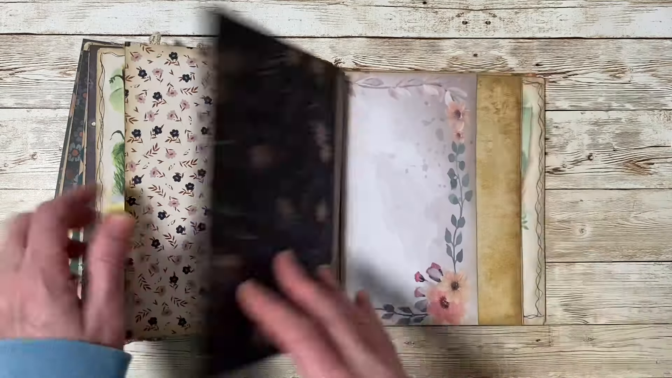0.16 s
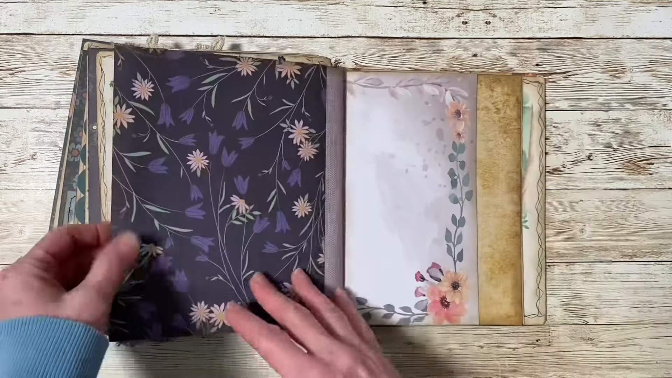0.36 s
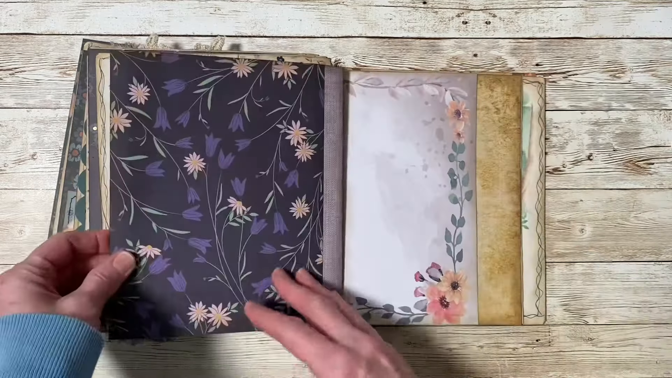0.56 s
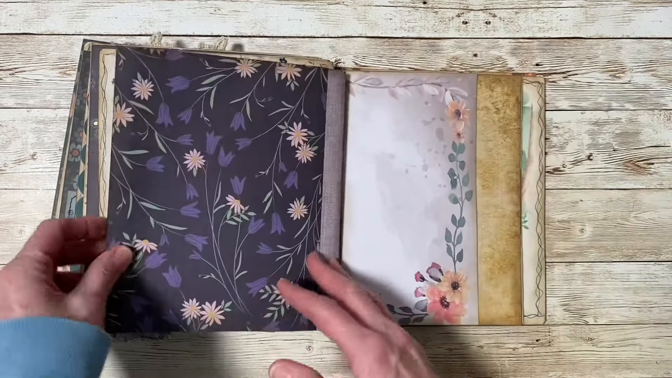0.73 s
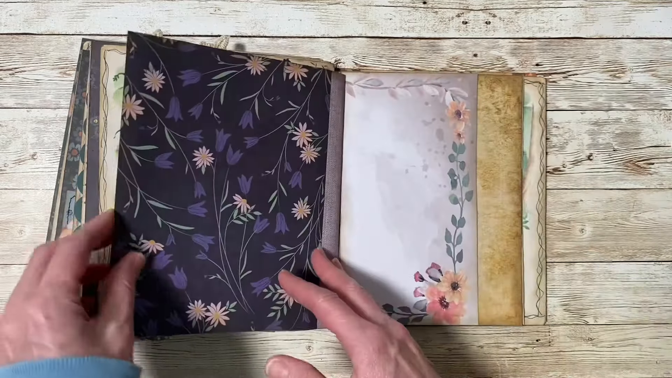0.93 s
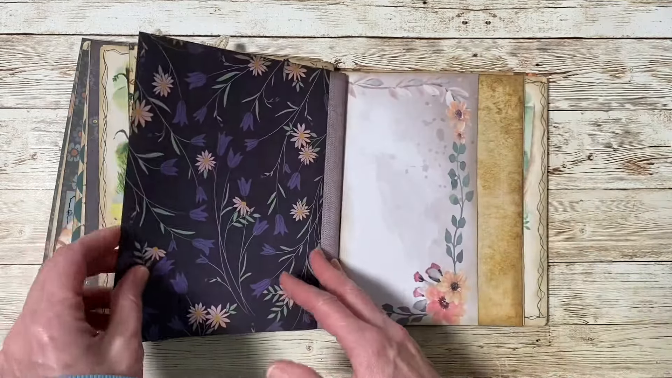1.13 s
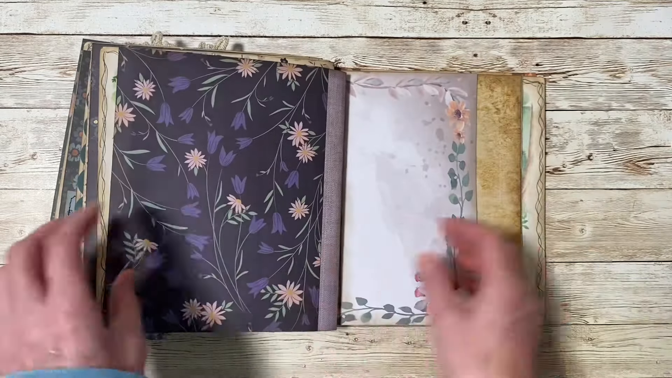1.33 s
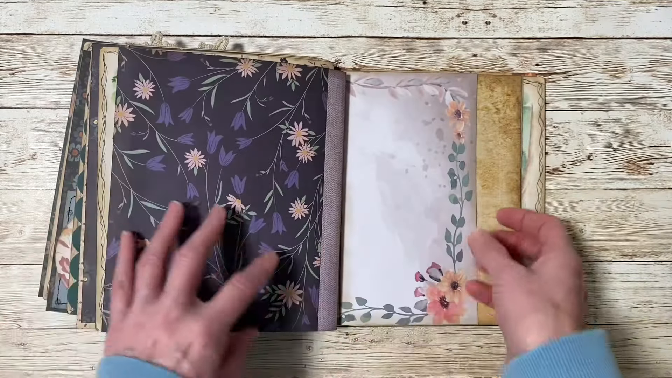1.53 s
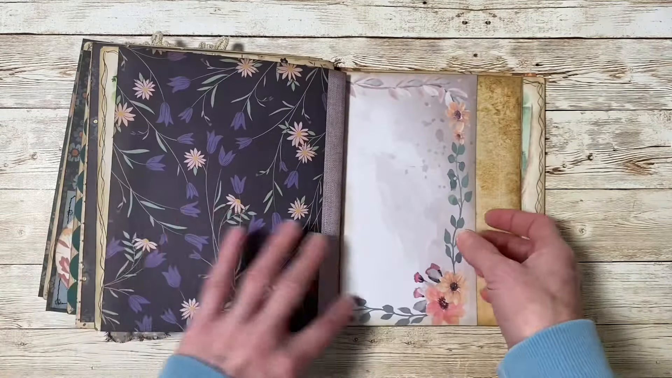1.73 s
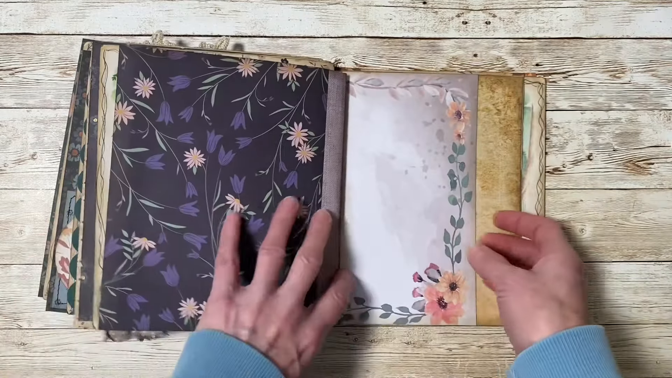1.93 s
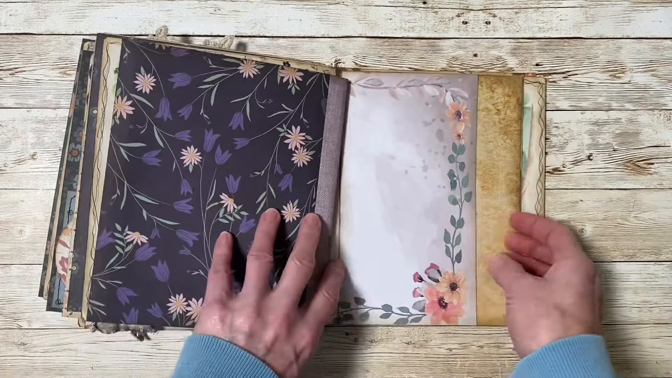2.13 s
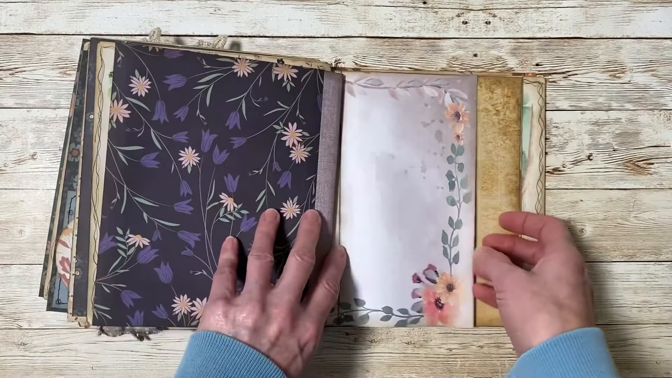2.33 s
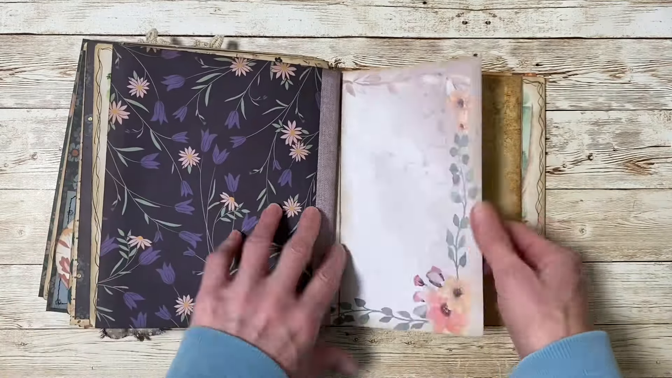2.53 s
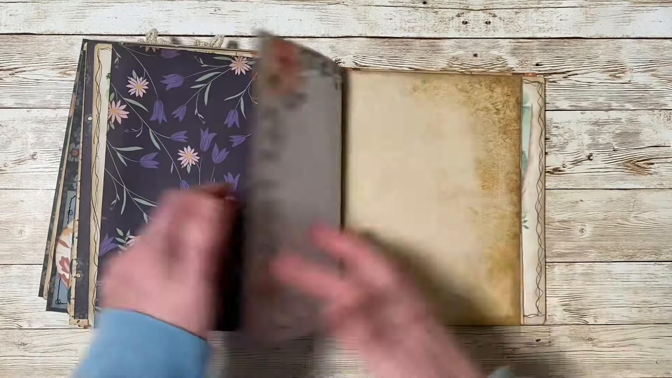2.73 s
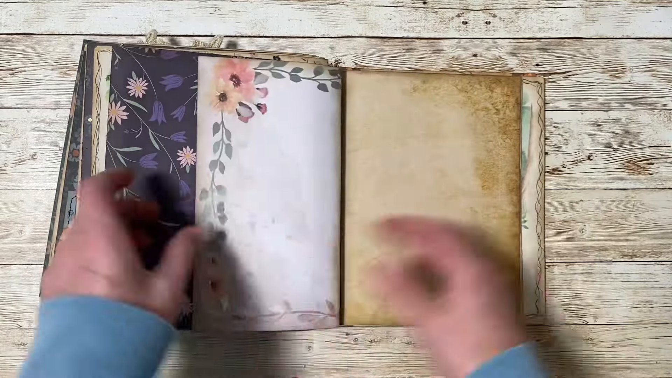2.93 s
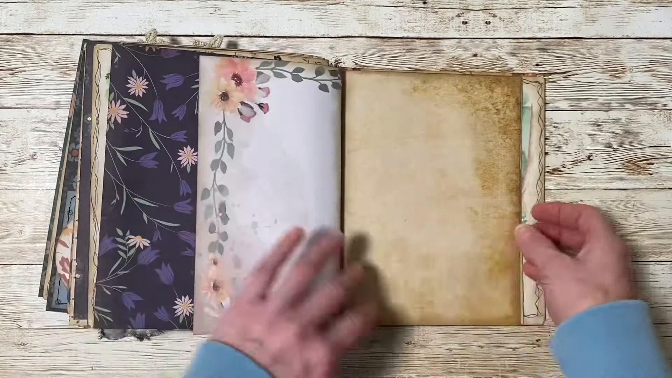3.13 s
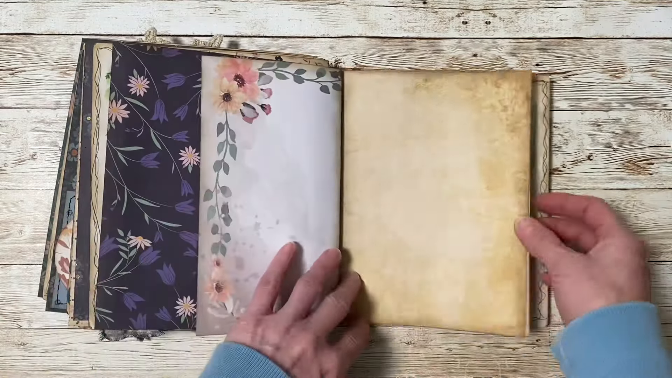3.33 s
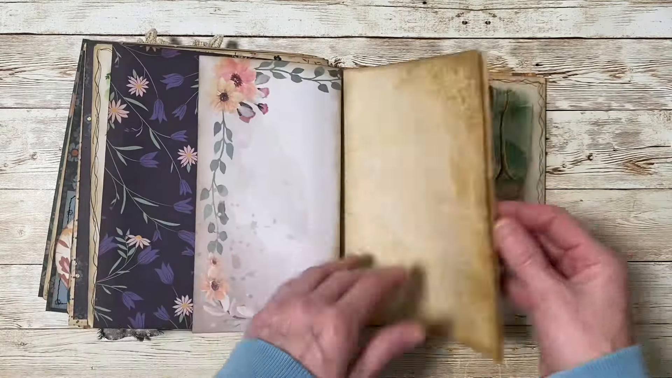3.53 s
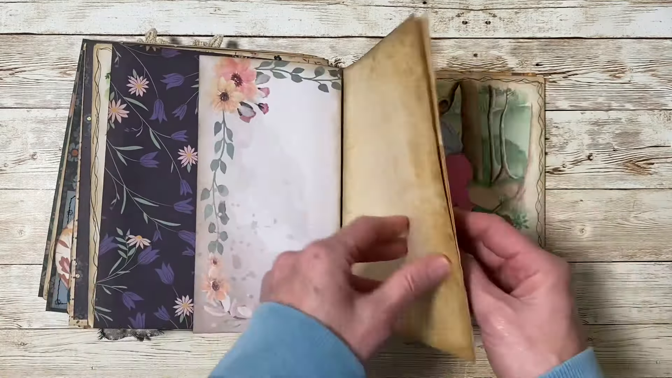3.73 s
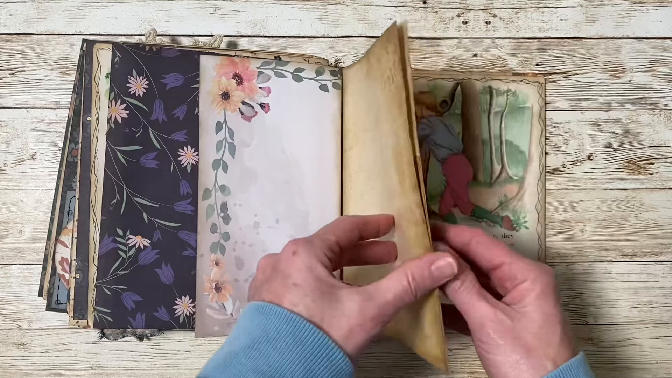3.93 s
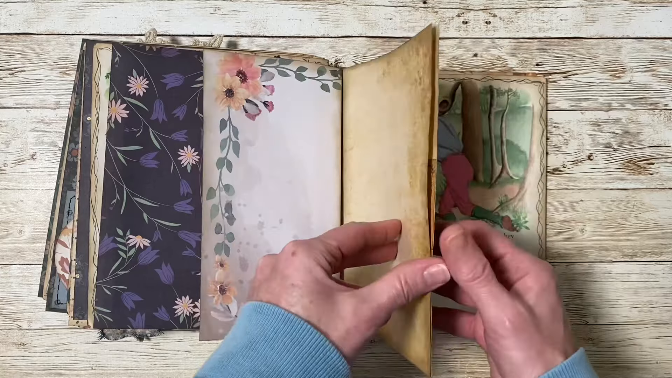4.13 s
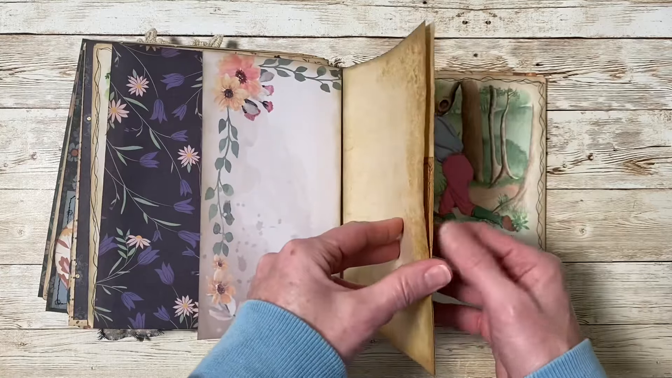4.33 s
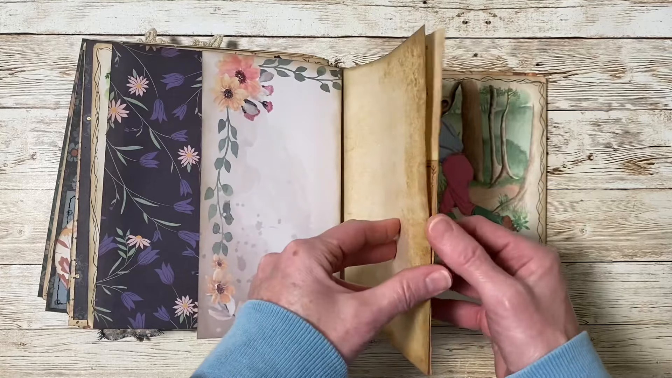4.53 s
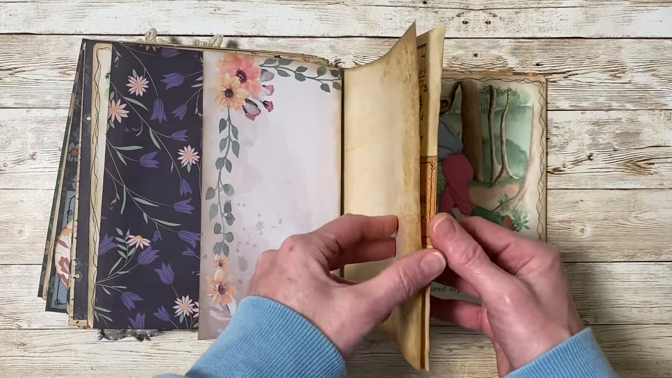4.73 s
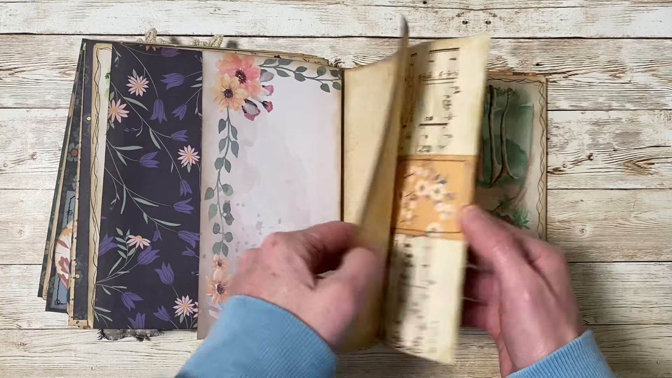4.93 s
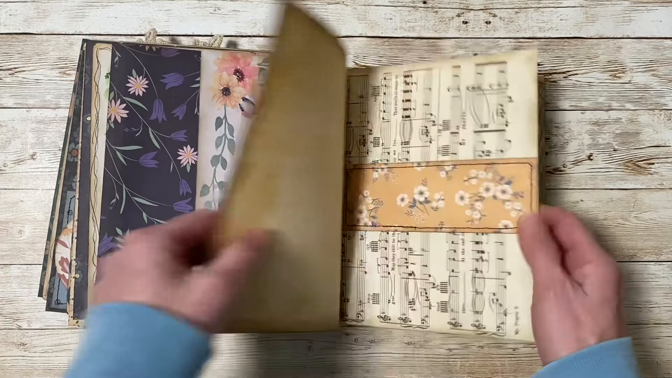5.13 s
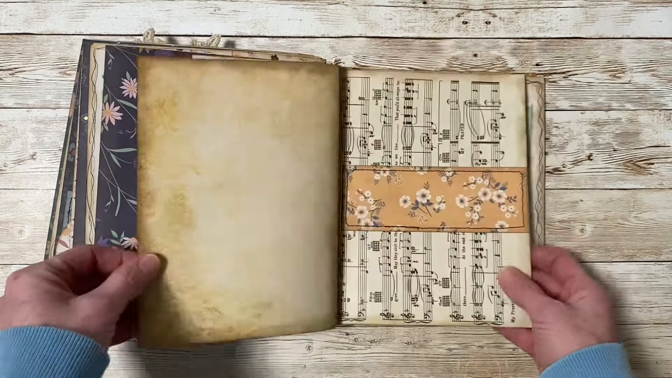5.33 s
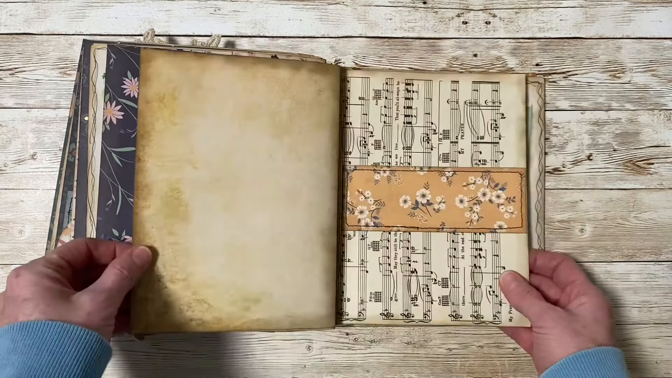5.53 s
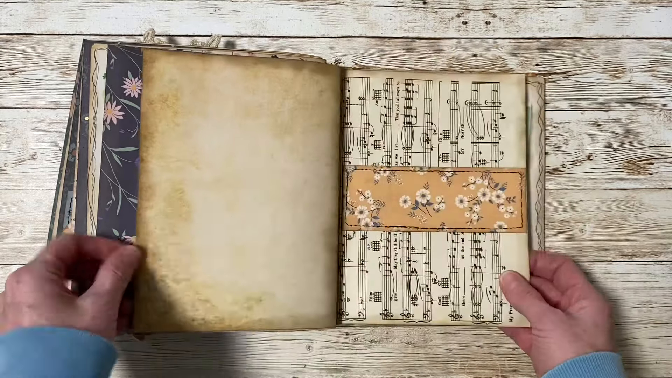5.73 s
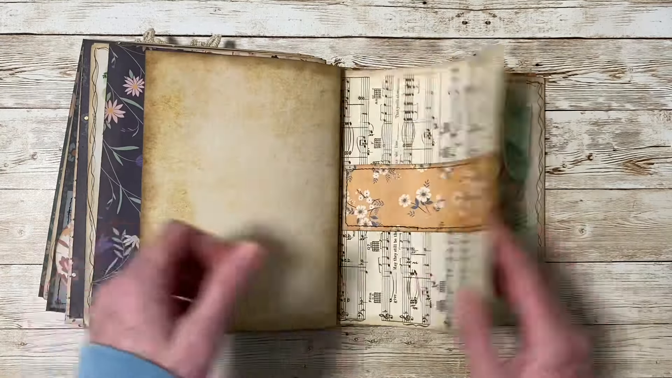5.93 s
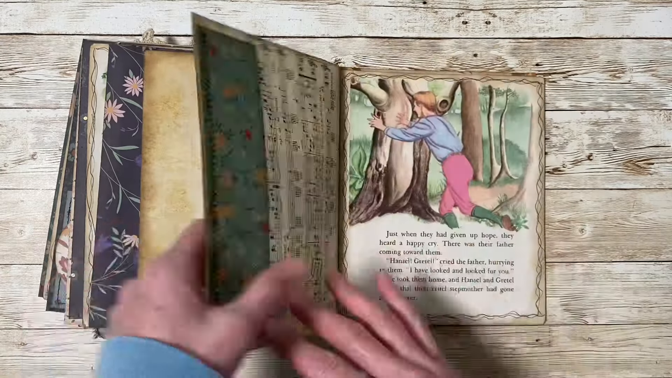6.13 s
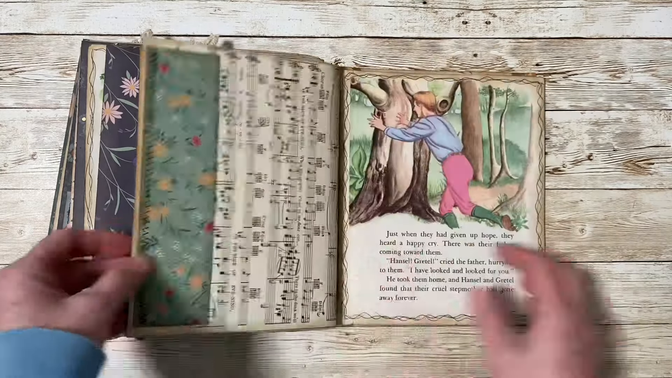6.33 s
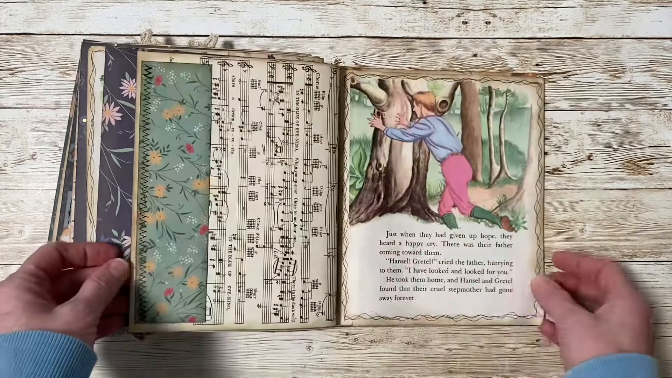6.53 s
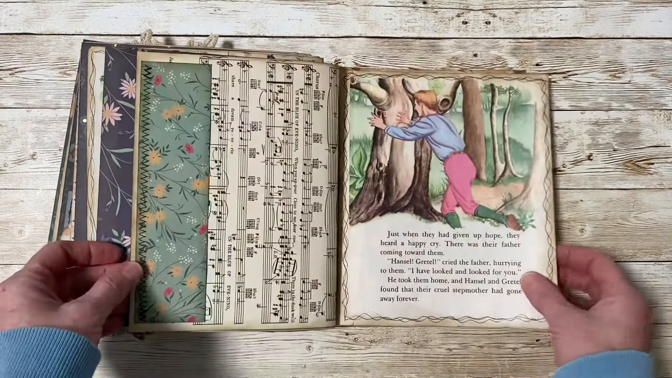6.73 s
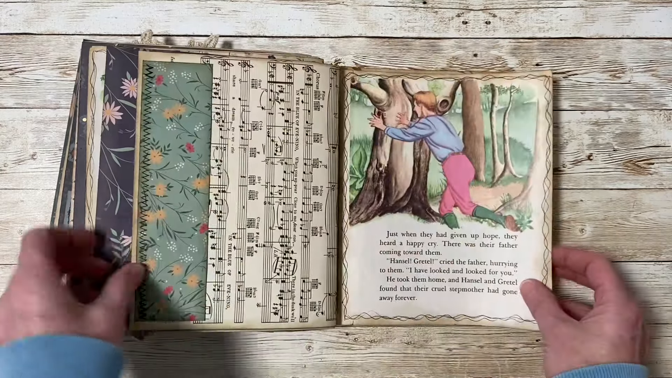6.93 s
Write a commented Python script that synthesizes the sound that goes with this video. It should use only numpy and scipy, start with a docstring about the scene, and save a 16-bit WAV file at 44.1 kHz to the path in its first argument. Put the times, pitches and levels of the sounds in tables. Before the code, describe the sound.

Hands leaf through a thick handmade paper book on a wooden table. A soft brushing and faint puff of air come first, then quiet rubbing and small ticks. A sharp, bright snap bursts out at about two and a half seconds, followed by rustles, a duller flap, a livelier swishing turn and another flap, ending in faint sliding. Close stereo camera microphones, small room, low rumble and faint hum.

```python
"""First a brushing of stiff paper over a low room rumble and faint mains hum, with soft puffs of air.
Place: a small room; a handmade book on a wooden table, two microphones close by in a camera.
Sheets and fingers slide as filtered noise of unequal slips; edges tick, bent pages snap through and slap
as bursts ringing through narrow papery resonances. Pressed pages thud as low damped sines, skin rasps as
wavering tones, and a short diffuse stereo tail of shaped noise follows the paper."""
import sys
import numpy as np
from scipy import signal
from scipy.fft import rfft, irfft, next_fast_len
from scipy.io import wavfile
from scipy.ndimage import uniform_filter1d, map_coordinates

SR = 44100
rng = np.random.default_rng(int(sys.argv[2]) if len(sys.argv) > 2 else 0)


def wav_record(signal):
    """Record a signal, one row per channel, as 16-bit PCM in the file named by sys.argv[1]."""
    frames = np.transpose(np.atleast_2d(signal))
    bounded = np.clip(frames, -1, 1)
    # unit amplitude maps onto the largest positive 16-bit level
    quanta = np.round(bounded * 32767).astype(np.int16)
    wavfile.write(sys.argv[1], SR, quanta)


N = 311698  # length in samples

# Room rumble and hiss. Each row: frequency in Hz, relative level in dB per Hz.
ROOM_AIR_SPECTRUM = [(20, -1.5), (45, 2.5), (70, 7), (100, 5), (150, 3), (200, -8.5), (300, -14),
                     (600, -53.5), (2000, -43), (6000, -45), (15800, -43)]
# Mains hum. Each row: frequency in Hz, mean level in dB rms.
HUM_TONES = [(59.7, -64.5), (119.8, -68.5)]
# Air pushed by a swinging page or hand. Each row: peak time in seconds, rise and fall time constant in
# seconds, peak level in dB.
AIR_PUFFS = [(0.02, 0.15, -50.5), (2.84, .38, -53), (3.749, 0.16, -67), (6.1, .25, -63.5),
             (7.0, 0.24, -70.5)]
# Colour of the air puffs. Each row: frequency in Hz, relative level in dB.
PUFF_SPECTRUM = [(12, -35.0), (28, -15.0), (40, -4.5), (52, -2.5), (75, -12.5), (200, -49.5)]
# A sheet or finger slides. Each row: start in seconds, length in seconds, rubbing level in dB, swell over
# the stroke in dB, edge hiss over the rub in dB, sheet flexing over the rub in dB.
SLIDING_STROKES = [(0.0, 0.069, -68.5, 10, 3.5, 3), (0.1, 0.13, -74.5, 0, -7, 7),
                   (0.229, .1, -63.5, -9, -1, 1.5), (0.346, .15, -76, -7.5, 4, 0.5),
                   (0.564, 0.16, -72, 12.5, 6, -11), (0.814, 0.36, -79.5, -4.5, 4.5, -5.5),
                   (1.162, 0.05, -71, 12, 5, -19), (1.232, 0.012, -71, 7, 13, -5),
                   (1.385, .2, -75, 3, 2.5, -5), (1.785, .06, -73.5, -3, 4, -6.5),
                   (1.847, 0.19, -66, 3.5, 2.5, -9), (2.105, 0.37, -66.5, 1.5, 1.5, -9),
                   (2.36, 0.045, -55.5, -8, -4, -12.5), (2.421, 0.048, -56.5, 17, 3.5, -16),
                   (2.506, .14, -58, -1.5, -6, -1.5), (2.658, .07, -70.5, -1, 5, -3.5),
                   (2.75, 0.13, -61, -1.5, 3.5, -1), (2.91, 0.013, -61.5, -0.5, 4.5, -7.5),
                   (3.184, 0.16, -66, -2, -2.5, -0.5), (3.346, 0.11, -56, -1.5, 0, -12),
                   (3.47, 0.19, -65.5, 7, 4.5, -6), (3.684, 0.084, -64, -9, 5, -3.5),
                   (3.783, 0.064, -67, 2, 7, -8.5), (3.87, 0.11, -77.5, 7.5, 10.5, -2.5),
                   (3.959, 0.15, -68.5, -7.5, 1.5, -0.5), (4.172, 0.049, -62.5, 0.5, 2.5, -6.5),
                   (4.265, .17, -82, -8, 0.5, 5.5), (4.465, 0.064, -68, 7.5, 1, -2.5),
                   (4.541, 0.1, -68.5, 2, 4, -1), (4.795, .04, -64, -4, -9, 6),
                   (4.847, 0.065, -58, 10, 5.5, -11), (4.898, 0.15, -51, -5.5, -6, -9),
                   (5.027, 0.088, -57.5, -2, -1.5, -7), (5.133, 0.22, -57.5, 0, 1.5, -7),
                   (5.583, .17, -76.5, 0, 9, -16), (5.707, 0.021, -64, 2, 9.5, -12.5),
                   (5.773, 0.16, -62, 3.5, -3.5, -10.5), (5.949, .08, -60.5, 0, 5, -4.5),
                   (6.065, 0.069, -50.5, -6.5, -7.5, -2.5), (6.15, 0.078, -62.5, -3.5, 2.5, -1),
                   (6.228, .17, -68, 4.5, 5, -5), (6.418, 0.23, -82, -0.5, 5, 13.5),
                   (6.56, 0.26, -64, -2, 0, -6.5), (6.817, 0.11, -69.5, 3, 3, -7),
                   (6.887, 0.16, -64, -3.5, 2, -15)]
# Colours of a bending sheet, a rubbed face and a hissing edge.
# Each row: frequency in Hz, relative level in dB per Hz.
FLEX_SPECTRUM = [(80, -19), (180, 7), (350, 0), (700, -3.5), (1000, -13.5), (2500, -43.5)]
RUB_SPECTRUM = [(400, -31.5), (750, 3), (1100, 2.5), (1400, 0), (2000, 1), (3100, -1), (4200, 1.5),
                (5200, -23.5), (9000, -46.5)]
HISS_SPECTRUM = [(2000, -39.5), (3600, -22.5), (4700, 2.5), (6500, 0.5), (8000, 0), (10000, 0.5),
                 (13000, 3), (15800, -5)]
# Stereo spread of the sliding, chosen freely. Each row: frequency in Hz, gain in dB.
SLIDING_SPREAD = [(300, -9.5), (1700, -20.5), (3000, -8.5), (5500, -19.5), (7500, -38.5), (15000, -16)]
# Edges and fingertips catch and let go. Each row: start in seconds, level in dB as rms over 10 ms before
# register colour, hardness in dB, weight in dB.
EDGE_TICKS = [(0.2093, -58.5, -2, 5), (0.2972, -58.5, 2.5, -6), (0.3309, -59, -2, -20),
              (0.3975, -66.5, -6, -4), (1.394, -61, -1, -23), (1.515, -58.5, 3, -13),
              (1.541, -58.5, -4, -8), (1.56, -73, 5, -5), (1.58, -52.5, -5.5, -6.5), (1.936, -62, -4, -10),
              (2.2458, -53.5, -11, -27), (2.3324, -55, -4, -16), (2.5115, -34, -24, -30),
              (2.5826, -44, -8, -12), (2.7394, -55, -3.5, -10), (2.8798, -56, 0, 1), (3.025, -71, 14, -17),
              (3.0414, -59.5, 4.5, -17), (3.0493, -54.5, 4.5, -21.5), (3.1854, -57, 2, -12),
              (3.2003, -57, 1.5, -11), (3.2591, -53.5, -6, -12), (3.2994, -59.5, 2, -12),
              (3.3168, -63, 2, -2), (4.022, -66, 7.5, -5), (4.0581, -60, -7, -6), (4.188, -61, 6, -13),
              (4.2354, -58.5, 0, -5.5), (4.3372, -75.5, 8.5, 1), (4.53, -63.5, -8, 2),
              (4.6145, -72.5, 16.5, -6), (4.7859, -60.5, -16, -9), (4.8067, -60, -12, 4),
              (4.8194, -60, -21, 6), (4.9444, -46.5, 5, -4.5), (5.1215, -67.5, 3, 11),
              (6.1121, -43, -26, -6), (6.1356, -51, -3, -4.5), (6.575, -61, 5, 0)]
# A page buckles or lands. Each row: start in seconds, rise in seconds, t60 in seconds before register
# stretch, level in dB as rms over 10 ms before register colour, hardness in dB, weight in dB.
PAGE_FLAPS = [(0.215, 0.0026, 0.022, -48.5, -3, 5), (0.256, 0.0016, .05, -56.5, 5, 12),
              (2.3543, .0009, 0.018, -31.5, 4, -29.5), (2.356, .002, 0.043, -34.5, -6, -16),
              (2.476, 0.0044, 0.008, -29.5, -5.5, -29), (2.481, 0.0054, 0.06, -21, -15.5, -23.5),
              (2.508, 0.018, 0.12, -40.5, -23, -13), (2.585, .009, .067, -43, -23, -4),
              (2.787, 0.0077, 0.096, -38, -27, -9), (2.817, 0.003, 0.034, -43.5, -7, -6.5),
              (3.335, 0.0023, 0.044, -47.5, -1, -8.5), (3.639, .0078, 0.056, -33, -6, -7),
              (3.667, 0.0054, 0.16, -45.5, -10.5, 0.5), (4.632, 0.0031, 0.045, -58.5, 10.5, -9),
              (4.902, .0016, 0.032, -37.5, 2.5, -14), (5.271, 0.0084, 0.086, -45.5, 1.5, -6.5),
              (5.415, 0.0098, .1, -51.5, 6.5, -31.5), (6.047, 0.0019, 0.028, -37, 2, -29),
              (6.053, 0.0029, 0.063, -32.5, -9, -10.5), (6.095, 0.005, 0.11, -43, -15, -2.5),
              (6.185, .0035, 0.088, -55, -13, 7), (6.58, 0.0099, 0.19, -70.5, 10, 17),
              (6.647, 0.006, 0.099, -65.5, -10, 10.5), (6.779, 0.008, .078, -49.5, -5.5, -27)]
# Five registers of a contact: thump, knock, body, crack, fizz.
# Each row: low edge in Hz, high edge in Hz, lag in seconds, decay stretch as a factor.
CONTACT_REGISTERS = [(83.5, 480, 0.00052, 1.6), (484, 1426, 0.0013, 1.06), (1364, 3330, 0.0015, 1.1),
                     (4100, 6800, 0.0017, 0.96), (7440, 16000, 0.0016, 0.99)]
# One value per register: level of a page, then of a tick [dB].
PAGE_COLOUR_DB = [0, 3, 0, 0.5, -4]
CLICK_COLOUR_DB = [-1, 1, -1.5, -1, -1]
# One value per register: share of the weight (lifts the lows), then of the hardness (lifts the highs) [dB/dB].
WEIGHT_BY_REGISTER = [0.86, .42, 0.0084, 0.03, 0.1]
HARDNESS_BY_REGISTER = [0.073, 0, 0.014, 0.91, 1.17]
# Broad colour of a struck page. Each row: frequency in Hz, relative level in dB.
SHEET_SPECTRUM = [(120, 4), (350, -3.5), (650, -3), (820, 0), (1100, 0), (1380, 2.5), (1950, 3), (2600, 0),
                  (3150, -0.5), (4000, -0.5), (5200, -1), (6400, -2.5), (8000, -1), (10000, -5.5),
                  (15500, -19)]
# Narrow resonances that give the contacts a papery ring.
# Each row: frequency in Hz, width in Hz, strength in dB.
PAPERY_RESONANCES = [(474, 98, -7), (608, 81, -4.5), (878, 14, -3), (1090, 68, -0.5), (1152, 29, -1),
                     (1315, 35, -4.5), (1670, 32, -4), (1910, 22, -4.5), (2024, 66, 3), (2210, 56, 1),
                     (2400, 49, -1.5), (2730, 27, -9), (2900, 24, 0), (3240, 72, -2.5)]
# Hands and pages press on the thick book. Each row: start in seconds, pitch in Hz, t60 in seconds,
# level in dB of the decay before its soft onset.
BOOK_THUDS = [(1.596, 128, 0.14, -48), (2.486, 133, 0.092, -56), (3.645, 163, 0.12, -40.5),
              (6.419, 306, 0.082, -45), (6.586, 204, 0.15, -47.5)]
# Short pitched drags of skin or paper. Each row: start in seconds, length in seconds, pitch in Hz,
# width in Hz, level in dB rms before the grip fades.
SKIN_RASPS = [(1.856, 0.076, 5410, 1290, -63), (2.287, 0.046, 5300, 1110, -65),
              (2.367, 0.051, 4810, 1475, -51), (3.189, 0.039, 751, 694, -57),
              (5.013, 0.034, 5370, 890, -54.5), (5.268, 0.038, 5320, 1034, -48.5),
              (5.586, 0.19, 2733, 897, -64.5), (6.349, 0.014, 6020, 2580, -52),
              (6.408, 0.11, 349.7, 332, -65.5), (6.666, 0.028, 3560, 805, -56),
              (6.743, .065, 3115, 1116, -60.5)]
# Decay of the short diffuse tail. Each row: frequency in Hz, t60 in seconds.
TAIL_DECAY = [(150, 0.24), (1000, 0.19), (4000, 0.07), (14000, 0.092)]
# Gain of the short diffuse stereo tail, shaped freely. Each row: frequency in Hz, gain in dB.
TAIL_GAIN = [(150, -25.0), (600, -2.5), (1500, -16.5), (3000, -12.5), (6000, -9.5), (7400, -33.5),
             (9000, -6.5), (12000, -15.0), (13800, -25.5)]
# Level of the left microphone over the right. Each row: frequency in Hz, level in dB.
LEFT_TILT = [(30, 1), (125, -2), (250, -1), (500, -2.5), (1000, -.5), (3500, -1), (4500, -2.5), (5300, 0.5),
             (8000, 0.3), (15000, 0)]
# Phase by which the left microphone leads. Each row: frequency in Hz, lead in radians.
LEFT_LEAD = [(20, 0), (1900, 0), (2760, .6), (4390, .65), (5100, .15), (6000, 1.4), (7000, 2.95),
             (7900, 3.3), (9800, 6.1), (11400, 6.5), (12800, 9), (14200, 9.6), (15400, 12.2)]

TOP_HZ = 15900  # band limit of the camera
GRIP_S, RELEASE_DB_PER_S = 0.023, 224.5  # a stroke takes hold, and dies away when the hand stops
REST_DB = -85.5  # hands resting on paper
RUB_HZ, HISS_HZ = 1700, 5950  # resonance centres when hiss and flexing are equally strong
RUB_RISE, HISS_RISE = 0.039, 0.006  # octaves per dB of hiss over flexing: a taut sheet sounds higher
CRACKLES_PER_S, CRACKLE_DB, CRACKLE_SCATTER_DB = 14, -7, 5.5  # level against the rub, scatter either way
CRACKLE_HARDNESS_DB, CRACKLE_WEIGHT_DB = -6.5, -7.5  # light, fairly soft contacts
SNAP_RISE_S = 0.0012  # a page that gives way faster than this does so mostly in one snap


def amp(db):
    """Decibels to gain."""
    return 10 ** (np.asarray(db) / 20)


def unit(x):
    """Scale to rms 1."""
    return x / np.sqrt(np.mean(x ** 2) + 1e-20)


def along(points, hz):
    """(Hz, value) points read on a log frequency axis."""
    f, v = np.transpose(points)
    return np.interp(np.log(hz + 1), np.log(f + 1), v)


def wobble(rate):
    """A smooth random curve, rate knots a second."""
    knots = rng.standard_normal(int(N * rate / SR) + 4)
    return map_coordinates(knots, [np.arange(N) * rate / SR])


def filtered(x, response):
    """Filter x by a response given as a function of frequency."""
    size = next_fast_len(N + SR // 2)
    spectrum = rfft(x, size) * response(np.fft.rfftfreq(size, 1 / SR))
    return irfft(spectrum, size)[..., :N]


def coloured(x, spectrum):
    """Give x a (Hz, dB) spectrum, at rms 1."""
    return unit(filtered(x, lambda hz: amp(along(spectrum, hz))))


def grains(size, spread_db):
    """Tiny fibre slips of very unequal strength."""
    strength = amp(spread_db * rng.standard_normal(size))
    return unit(rng.standard_normal(size) * strength)


def add(track, s, sound):
    """Mix a sound into a track at time s."""
    part = track[max(round(s * SR), 0):][:len(sound)]
    part += sound[:len(part)]


def background():
    """Low rumble and faint hiss, nearly alike at both microphones, with a slightly unsteady mains hum."""
    t = np.arange(N) / SR
    hum = 0
    for hz, db in HUM_TONES:
        level = amp(db + 0.9 * wobble(6.4)) * np.sqrt(2)  # rms to peak
        hum = hum + level * np.sin(2 * np.pi * hz * t + 0.47 * wobble(3.1))
    shared = rng.standard_normal(N)
    separate = rng.standard_normal((2, N))
    air = coloured(shared + 0.057 * separate, ROOM_AIR_SPECTRUM)
    return hum + amp(-65.0) * air


def draught():
    """Slow puffs of air reach the microphones as low noise that swells and falls exponentially."""
    t = np.arange(N) / SR
    push = sum(amp(db) * np.exp(-abs(t - s) / fade) for s, fade, db in AIR_PUFFS)
    return push * coloured(rng.standard_normal(N), PUFF_SPECTRUM)


def stroke_levels():
    """Levels in dB of flexing, rubbing and hiss: each stroke takes hold, swells or fades, and is released."""
    t = np.arange(N) / SR
    power = np.full((3, N), amp(REST_DB) ** 2)
    for s, length, db, swell_db, edge_db, bend_db in SLIDING_STROKES:
        near = slice(max(int(s * SR), 0), int((s + length + .5) * SR))
        age = t[near] - s
        swell = swell_db * (np.minimum(age / length, 1) - .5)
        release = RELEASE_DB_PER_S * np.maximum(age - length, 0)
        shape = np.clip(age / GRIP_S, 0, 1) * amp(db + swell - release)
        power[:, near] += (amp([[bend_db], [0], [edge_db]]) * shape) ** 2
    return 10 * np.log10(power)


def scrape(spectrum, centre_hz, octaves, patchy_db, spread_db):
    """Fibre slips heard through a broad moving resonance; narrow ones come and go as the sheet bends."""
    hz, t, z = signal.stft(grains(N, spread_db), SR, nperseg=512)
    centre = np.interp(t, np.arange(N) / SR, centre_hz)
    patches = rng.standard_normal(z.shape)
    patches = uniform_filter1d(patches, size=4, axis=0)  # across frequency
    patches = uniform_filter1d(patches, size=9, axis=1)  # across time
    hump = np.exp(-(np.log2((hz[:, None] + 1) / centre) / (2 * octaves)) ** 2)
    gain = hump * amp(along(spectrum, hz)[:, None] + patchy_db * unit(patches))
    gain = gain / np.sqrt(np.mean(gain ** 2, axis=0))  # the colour moves, the level holds
    return unit(signal.istft(z * gain, SR, nperseg=512)[1][:N])


def sliding(flex_db, rub_db, hiss_db):
    """Paper drags over paper in uneven slips: the sheet flexes, its face rubs, its edge hisses."""
    taut_db = hiss_db - flex_db
    rub_hz = RUB_HZ * 2 ** (RUB_RISE * taut_db)
    hiss_hz = HISS_HZ * 2 ** (HISS_RISE * taut_db)
    slip = unit(wobble(70) + 0.21 * wobble(260))
    flex = amp(flex_db + 0.79 * slip) * coloured(grains(N, spread_db=6), FLEX_SPECTRUM)
    crinkle = unit(amp(1.77 * wobble(330)))  # the rub comes in tiny clumps
    face = scrape(RUB_SPECTRUM, rub_hz, octaves=0.82, patchy_db=4.5, spread_db=4.0)
    rub = amp(rub_db + 0.69 * slip) * crinkle * face
    edge = scrape(HISS_SPECTRUM, hiss_hz, octaves=0.66, patchy_db=3.0, spread_db=5)
    hiss = amp(hiss_db + 1.1 * slip) * edge
    return flex + rub + hiss


def page_ring(low_hz, high_hz, size=8192):
    """Minimum-phase response within one register: narrow papery resonances over the broad sheet colour."""
    hz = np.fft.rfftfreq(size, 1 / SR) + 1
    resonances = 1
    for centre, width, db in PAPERY_RESONANCES:
        damping = 1j * hz * width
        resonances = resonances + amp(db) * damping / (centre ** 2 - hz ** 2 + damping)
    band = 1 / np.sqrt((1 + (low_hz / hz) ** 8) * (1 + (hz / high_hz) ** 10))
    magnitude = amp(along(SHEET_SPECTRUM, hz)) * abs(resonances) * band
    cepstrum = irfft(np.log(np.maximum(magnitude, 1e-4)))
    # folding the cepstrum forward in time makes the response causal
    fold = np.r_[1, np.full(size // 2 - 1, 2), np.zeros(size // 2)]
    return irfft(np.exp(rfft(cepstrum * fold)))[:size // 2]


def register_levels(colour_db, db, hardness_db, weight_db):
    """Level of each register: a hard contact lifts the high ones, a heavy contact the low ones."""
    hardness = hardness_db * np.array(HARDNESS_BY_REGISTER)
    weight = weight_db * np.array(WEIGHT_BY_REGISTER)
    return db + np.array(colour_db) + hardness + weight


def contact(rings, rise, t60, snap, levels_db, spread_db):
    """One snap and a burst of small buckles ring the page, each register with its own lag and decay."""
    t = np.arange(SR // 6) / SR
    buckles, sound = grains(len(t), spread_db), 0
    rise, snap = max(rise, 1 / SR), np.clip(snap, 0, 1)  # snap is its share of the energy
    for (_, _, lag, stretch), ring, db in zip(CONTACT_REGISTERS, rings, levels_db):
        age = np.maximum(t - lag, 0)
        decay = amp(-60 * np.maximum(age - rise, 0) / (t60 * stretch))
        swell = np.minimum(age / rise, 1) * decay
        burst = buckles * swell
        force = np.sqrt(1 - snap) * burst / np.linalg.norm(burst)
        force[swell.argmax()] += np.sqrt(snap)
        part = signal.fftconvolve(force, ring)
        rms_10ms = np.sqrt(np.sum(part ** 2) / (SR / 100))  # whole energy over 10 ms
        sound = sound + amp(db) * part / rms_10ms
    return sound


def tick(rings, db, hardness_db, weight_db):
    """One short click: a brief burst of buckles with a small snap."""
    levels_db = register_levels(CLICK_COLOUR_DB, db, hardness_db, weight_db)
    return contact(rings, rise=.0005, t60=0.022, snap=0.22, levels_db=levels_db, spread_db=5.0)


def crackles(rings, rub_db):
    """Small ticks at random times, the louder the harder the sheet is rubbed."""
    track = np.zeros(N)
    for when, size in rng.random((int(CRACKLES_PER_S * N / SR), 2)):
        scatter = CRACKLE_SCATTER_DB * (2 * size - 1)
        db = rub_db[int(when * N)] + CRACKLE_DB + scatter
        add(track, when * N / SR, tick(rings, db, CRACKLE_HARDNESS_DB, CRACKLE_WEIGHT_DB))
    return track


def ticks(rings):
    """Paper edges and fingertips catch and let go in short clicks."""
    track = np.zeros(N)
    for s, *blow in EDGE_TICKS:
        add(track, s, tick(rings, *blow))
    return track


def flaps(rings):
    """Pages snap through their bend and slap onto the stack; the faster they give way, the cleaner the snap."""
    track = np.zeros(N)
    for s, rise, t60, *blow in PAGE_FLAPS:
        snap = 1 / (1 + (rise / SNAP_RISE_S) ** 4)
        levels_db = register_levels(PAGE_COLOUR_DB, *blow)
        add(track, s, contact(rings, rise, t60, snap, levels_db, spread_db=5))
    return track


def thuds():
    """The stack of pages answers a soft push with one low, damped note."""
    track, t = np.zeros(N), np.arange(SR // 4) / SR
    onset = 1 - np.exp(-t / 0.0037)
    for s, hz, t60, db in BOOK_THUDS:
        decay = amp(db - 60 * t / t60)
        add(track, s, decay * onset * np.sin(2 * np.pi * hz * t))
    return track


def rasps():
    """Skin sticks and slips on paper at a loosely held pitch."""
    track = np.zeros(N)
    for s, length, hz, width_hz, db in SKIN_RASPS:
        t = np.arange(int(max(length, .004) * SR)) / SR
        # grip force and slip rate both wander, which widens the pitch into a band
        sway = map_coordinates(rng.standard_normal(1024), [t * width_hz], mode="wrap")
        drift = np.cumsum(rng.standard_normal(SR // 4)[:len(t)]) * np.sqrt(width_hz / SR)
        grip = np.clip(np.minimum(t, t[-1] - t) / (0.16 * length), 0, 1)
        tone = unit(sway * np.sin(2 * np.pi * hz * t + drift))
        add(track, s, amp(db) * grip * tone)
    return track


def diffuse_tail(x):
    """A short tail of noise, decaying at a rate set by frequency, different at each microphone."""
    hz, t, z = signal.stft(rng.standard_normal((2, SR // 2)), SR, nperseg=256)
    decay = amp(-60 * t / along(TAIL_DECAY, hz)[:, None])
    tail = signal.istft(z * decay, SR, nperseg=256)[1]
    tail = tail * np.minimum(np.arange(tail.shape[1]) / SR / 0.0008, 1)  # builds up over 0.8 ms
    wet = signal.fftconvolve(x[None], tail / np.linalg.norm(tail[0]), axes=1)[:, :N]
    return filtered(wet, lambda hz: amp(along(TAIL_GAIN, hz)))


def scene():
    """The book lies a little to the right; slips all over its wide pages reach the two microphones unalike."""
    rings = [page_ring(low, high) for low, high, _, _ in CONTACT_REGISTERS]
    slide_db = stroke_levels()
    _, rub_db, _ = slide_db
    paper = sliding(*slide_db) + crackles(rings, rub_db) + ticks(rings) + flaps(rings) + thuds() + rasps()
    sides = np.array([[1], [-1]])  # left, right
    # a second draw of the slips, opposite in sign at the two microphones
    spread = sides * filtered(sliding(*slide_db), lambda hz: amp(along(SLIDING_SPREAD, hz)))
    pair = background() + draught() + paper + spread + diffuse_tail(paper)

    def placement(hz):
        """Half the level and phase difference goes to each microphone."""
        level = amp(sides * along(LEFT_TILT, hz) / 2)
        return level * np.exp(1j * sides * along(LEFT_LEAD, hz) / 2)

    return filtered(pair, placement)


def record(dry):
    """The camera keeps almost nothing above its band limit: a very steep low-pass."""
    return filtered(dry, lambda hz: 1 / np.sqrt(1 + (hz / TOP_HZ) ** 200))


dry = scene()
out = record(dry)
wav_record(out)
```